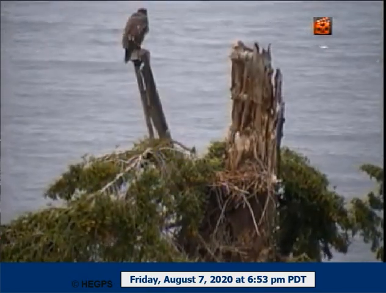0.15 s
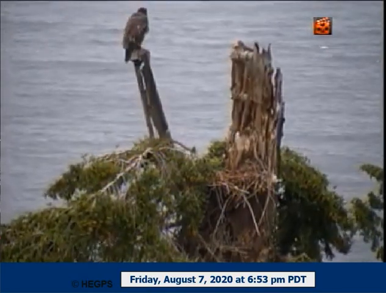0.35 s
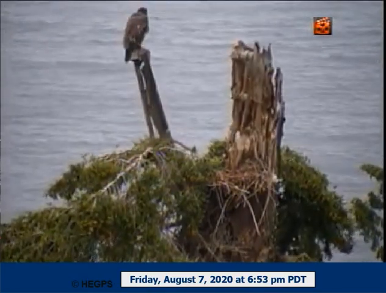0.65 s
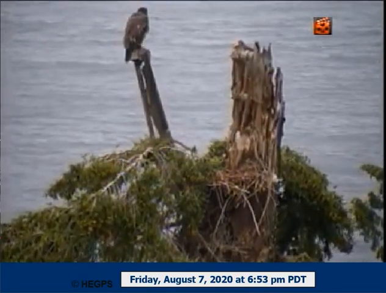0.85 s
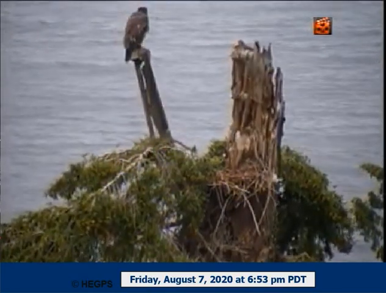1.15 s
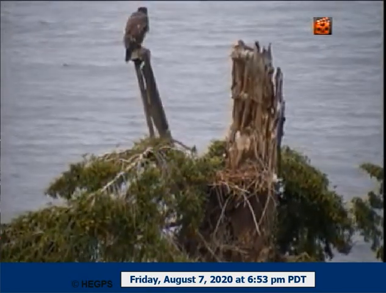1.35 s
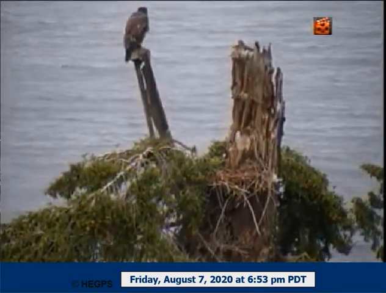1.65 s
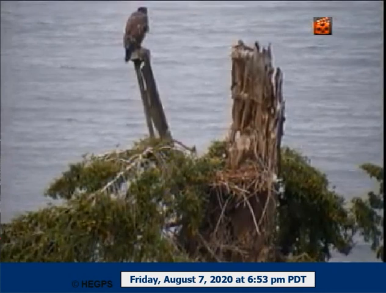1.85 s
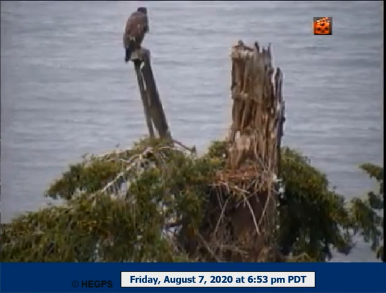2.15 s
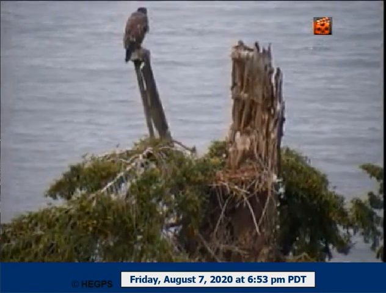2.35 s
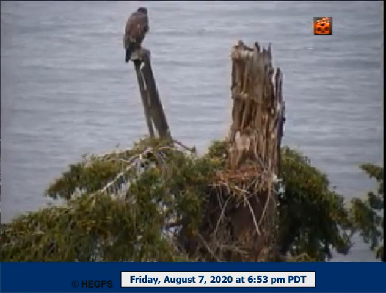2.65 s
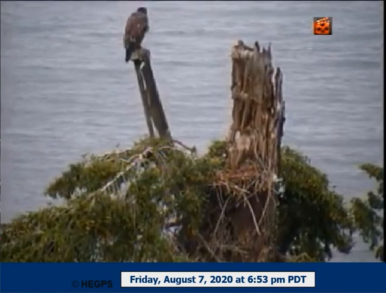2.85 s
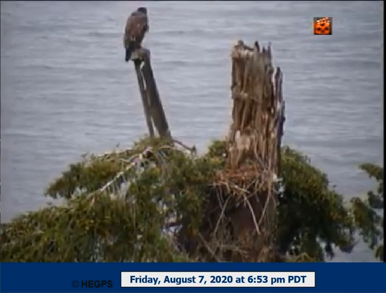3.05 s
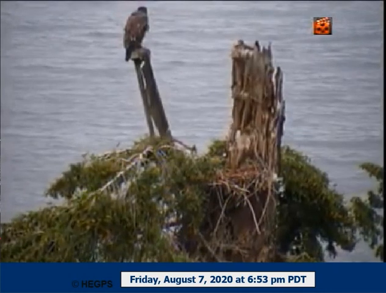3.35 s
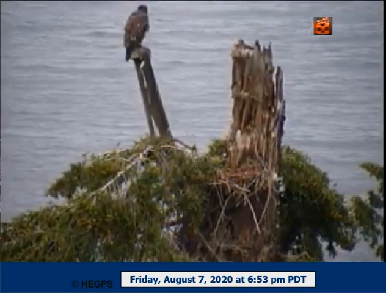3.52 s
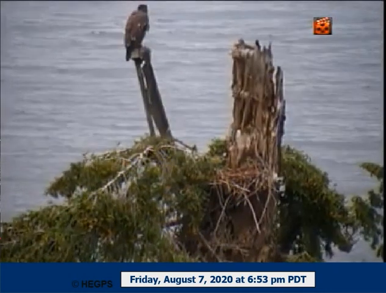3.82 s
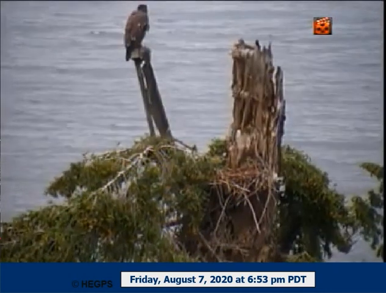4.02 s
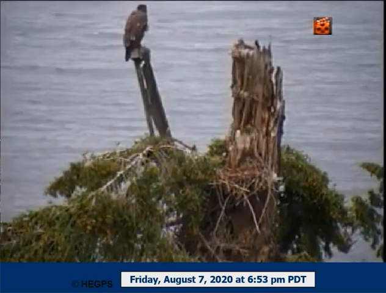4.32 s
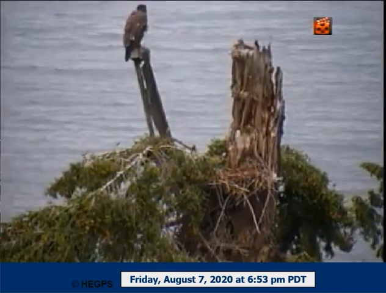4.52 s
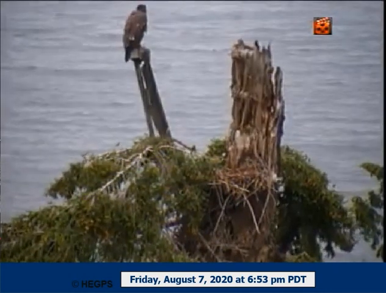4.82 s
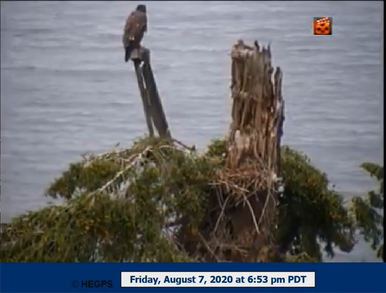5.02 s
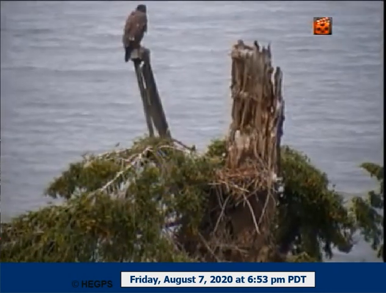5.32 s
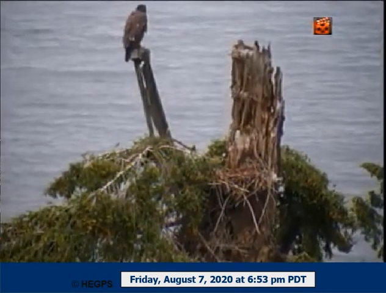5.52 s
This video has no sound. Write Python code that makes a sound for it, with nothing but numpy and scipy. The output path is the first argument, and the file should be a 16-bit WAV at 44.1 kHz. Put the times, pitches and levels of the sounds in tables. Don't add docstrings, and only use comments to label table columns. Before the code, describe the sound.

A close young eagle calls twice from a treetop perch: each call a thin pip, a quick stutter, a brief held whistle and a breaking downward slide, raspy at the edges. Between them come only gently wavering water hiss, subsiding low wind boom on the microphone and a few barely audible high chips. Branches and a distant shore return a dull, weak wash after each call.

```python
import sys
import numpy as np
from scipy import signal
from scipy.fft import rfft, irfft
from scipy.io import wavfile

SR = 44100
rng = np.random.default_rng(int(sys.argv[2]) if len(sys.argv) > 2 else 0)


def attenuation_scalar(level_db):
    decades = np.asarray(level_db, float) / 20
    return 10 ** decades


def transcribe(u):
    v = np.clip(np.atleast_2d(u).T, -1, 1)
    q = np.round(v * 32767).astype(np.int16)
    wavfile.write(sys.argv[1], SR, q)


N = 250488


def rms_one(x):
    return x / np.sqrt(np.mean(x ** 2) + 1e-20)


def in_time(rows):
    s, *columns = np.transpose(rows)
    return [np.interp(np.arange(N) / SR, s, column) for column in columns]


def band(x, low_hz, high_hz, order=2):
    return signal.sosfilt(signal.butter(order, [low_hz, high_hz], "band", fs=SR, output="sos"), x)


def drift(rate_hz, size=N):
    pole = np.exp(-2 * np.pi * rate_hz / SR)
    settled = signal.lfilter([1], [1, -2 * pole, pole * pole], rng.standard_normal(size + SR))[SR:]
    return rms_one(settled)


def coloured_noise(spectrum):
    hz, db = np.array(spectrum).T
    colour = attenuation_scalar(np.interp(np.log(np.fft.rfftfreq(N, 1 / SR) + 1), np.log(hz), db))
    return rms_one(irfft(rfft(rng.standard_normal(N)) * colour, N))


def add(track, start_s, sound):
    at = round(start_s * SR)
    track[at:at + len(sound)] += sound


# (time [s], level [dB])
GUSTS = [(0.0, -21), (0.16, -14.5), (0.17, -22), (1.53, -17), (1.75, -25.5), (2.01, -22), (2.09, -32.5),
         (2.37, -22.5), (2.4, -29), (3.16, -25), (3.18, -29), (4.49, -31.5), (4.65, -24.5), (4.9, -34.5),
         (5.46, -29.5), (5.68, -32)]
# (lower edge [Hz], upper edge [Hz])
HOUSING_BANDS = [
    (70, 115.5),
    (110, 173.2),
    (170, 224.4),
]
# (level at a -25 dB gust [dB], share of the gust's swing [dB per dB])
HOUSING_SHARES = [
    (-30.5, 1.09),
    (-28, 1.12),
    (-31, 0.71),
]


def wind(lump_db=1.47, lumps_per_s=2.4):
    gust_db = in_time(GUSTS)[0]
    out = np.zeros(N)
    for (level_db, share), (low_hz, high_hz) in zip(HOUSING_SHARES, HOUSING_BANDS):
        turbulence = rng.standard_normal(N + SR)
        mode = rms_one(band(turbulence, low_hz, high_hz, order=3)[SR:])
        mode_db = level_db + share * (gust_db + 25) + lump_db * drift(lumps_per_s)
        out += attenuation_scalar(mode_db) * mode
    return out


# (time [s], level [dB])
WATER_SWELL = [(0.0, -37), (0.93, -34.5), (1.44, -35), (2.36, -38), (3.18, -37.5), (3.69, -37),
               (4.46, -36.5), (4.98, -38), (5.68, -38)]
# (frequency [Hz], level per Hz [dB])
WATER_SPECTRUM = [(150, -36), (236, 1.5), (275, -6.5), (400, -9.5), (531, -16.5), (690, -8), (826, -17.5),
                  (957, -10.5), (1370, -18), (2210, -22), (3600, -32.5), (4300, -38.5), (6500, -44),
                  (12500, -52)]


def water(patchy_db=0.67):
    hiss = coloured_noise(WATER_SPECTRUM)
    hiss /= np.std(band(hiss, 300, 1500, order=4))
    return attenuation_scalar(in_time(WATER_SWELL)[0] + patchy_db * drift(3.1)) * hiss


# (time [s], peak level [dB])
SNAP = (1.3189, -34)


def twig():
    snap_s, peak_db = SNAP
    t = np.arange(200) / SR
    out = np.zeros(N)
    add(out, snap_s, attenuation_scalar(peak_db - 60 * t / .002) * rng.standard_normal(len(t)))
    return band(out, 4500, 12500)


# (time [s], peak level [dB], top pitch [Hz], length [s])
BIRD_CHIPS = [
    (3.586, -58, 7950, .037),
    (3.638, -57, 7350, .033),
    (3.740, -61, 8000, .036),
    (3.831, -66, 7800, .038),
]


def small_bird(rise_hz=950, drop_hz=1800):
    out = np.zeros(N)
    for start_s, peak_db, top_hz, length_s in BIRD_CHIPS:
        u = np.linspace(0, 1, round(length_s * SR))
        rise = rise_hz * np.clip(1 - u / 0.41, 0, 1) ** 2
        drop = drop_hz * np.clip((u - .45) / 0.45, 0, 1) ** 2
        cycles = np.cumsum(top_hz - rise - drop) / SR
        envelope = np.sin(np.pi * u) ** .5 * attenuation_scalar(peak_db + 4 * drift(200, size=len(u)))
        add(out, start_s, np.sqrt(2) * envelope * np.sin(2 * np.pi * cycles))
    return out


def leaves(x, blur_db=-5, t60_s=0.071):
    t = np.arange(SR // 10) / SR
    blur = rng.standard_normal(len(t)) * attenuation_scalar(-60 * t / t60_s)
    return x + attenuation_scalar(blur_db) * signal.fftconvolve(x, blur / np.linalg.norm(blur))[:N]


def echoes(x, near_db=-24, near_t60_s=.06, shore_db=-34, shore_t60_s=.28,
           far_db=-34, far_t60_s=1.8, delay_s=0.18, flutter_db=2.5):
    t = np.arange(SR) / SR
    late = np.maximum(t - delay_s, 0)
    near = rng.standard_normal(SR) * attenuation_scalar(-60 * t / near_t60_s)
    shore = band(rng.standard_normal(SR), 3100, 8000, order=1)
    shore = shore * attenuation_scalar(-60 * late / shore_t60_s) * np.clip(late / 0.044, 0, 1)
    far = band(rng.standard_normal(SR), 3730, 4150, order=2)
    far = far * attenuation_scalar(-60 * late / far_t60_s) * np.clip(t / delay_s, .15, 1) ** 2
    paths = [(near_db, near), (shore_db, shore), (far_db, far)]
    response = sum(attenuation_scalar(db) * path / np.linalg.norm(path) for db, path in paths)
    return signal.fftconvolve(x, response)[:N] * attenuation_scalar(flutter_db * drift(58))


CALL_ONSETS = [
    1.669,
    4.704,
]
# (time after onset [s], pitch [Hz], effort [dB], odd harmonics [dB], gape [dB per octave])
OPENING_PIP = [
    (0, 1810, -47, -30, -4),
    (.0045, 1815, -31, -35, 12),
    (.008, 1850, -37, -7, 12),
    (.0115, 1885, -43, -2, 5),
]
# (time [s], pitch [Hz], effort [dB], odd harmonics [dB], gape [dB per octave])
STUTTER_NOTES = [
    [(1.680, 2040, -36, 9, 9), (1.685, 2120, -40, -1, 2), (1.690, 2230, -38, -9, -2),
     (1.694, 2150, -50, -6, 3)],
    [(4.7142, 1580, -34, -7, 13), (4.717, 1640, -26.5, 4.5, 6.5), (4.7225, 1640, -28, 4, 6),
     (4.7247, 1730, -31, 0, 7)],
]
HOLD_NOTES = [
    [(1.689, 1880, -44, 4, 4), (1.694, 1890, -33, -20, 18.5), (1.705, 1919, -31, -36, 14),
     (1.723, 1910, -32, -33, 9.2), (1.734, 1830, -26, -14, 3), (1.744, 1840, -44, -6, 8)],
    [(4.7285, 1870, -28, 4, -4), (4.733, 1860, -22.5, -12, 3), (4.745, 1866, -25, -4, -5),
     (4.754, 1856, -24, -12, -3), (4.760, 1840, -21, -28, -3), (4.768, 1819, -30, -27, -1),
     (4.771, 1815, -42, -14, 1.1)],
]
FALL_NOTES = [
    [(1.748, 1852, -34, 9, -13), (1.753, 1763, -27, -2.5, -2), (1.770, 1748, -26.5, -4, -1.1),
     (1.800, 1697, -26.5, -2.5, -1), (1.808, 1534, -28, -5, -1), (1.818, 1365, -35.5, -0.5, 3),
     (1.833, 1156, -41, -4, 7.5), (1.854, 1110, -39.5, 3, -5.5), (1.870, 970, -50, -6, -5)],
    [(4.775, 1826, -30, 9, -13), (4.795, 1784, -35, 8.5, -8), (4.808, 1734, -25, -4, -10),
     (4.818, 1690, -28, -6, -5), (4.838, 1414, -30.5, -4, 0.1), (4.849, 1213, -34.5, -9, -3),
     (4.859, 1150, -39, -2, -0.5), (4.885, 1080, -44, -1, -6), (4.920, 950, -62, -6, -16)],
]
# (share of the flip to come, pitch [Hz], effort [dB], odd harmonics [dB], gape [dB per octave])
REGISTER_FLIP = [
    (1, 1950, -46, 3, 0.1),
    (.55, 2090, -35, 9, -6),
]
HOLD_FLIPS = [0, .0045]
FALL_FLIPS = [.009, .006]


def notes():
    pips = [[(onset_s + s, *rest) for s, *rest in OPENING_PIP] for onset_s in CALL_ONSETS]
    out = [*pips, *STUTTER_NOTES]
    for note, flip_s in zip([*HOLD_NOTES, *FALL_NOTES], [*HOLD_FLIPS, *FALL_FLIPS]):
        lead = [(min(note)[0] - share * flip_s, *rest) for share, *rest in REGISTER_FLIP if flip_s]
        out.append([*lead, *note])
    return out


# (frequency [Hz], level [dB])
THROAT_GAIN = [(2250, -5.5), (2850, -5.5), (4300, 1.5), (5400, -2), (6500, -14), (8500, -12.5), (9000, -23)]
# (frequency [Hz], depth [dB], width [Hz])
THROAT_DIPS = [
    (2560, 10, 110),
    (5030, 13, 130),
]


def throat_db(hz):
    pipe_hz, pipe_db = np.array(THROAT_GAIN).T
    gain_db = np.interp(np.log(hz), np.log(pipe_hz), pipe_db)
    for at_hz, depth_db, width_hz in THROAT_DIPS:
        gain_db = gain_db - depth_db * np.exp(-((hz - at_hz) / width_hz) ** 2)
    return gain_db


# (time [s], depth [dB])
SECOND_DIPS = [
    (1.698, 18),
    (1.718, 17),
    (4.785, 8),
]
# (frequency [Hz], level [dB])
WINDPIPE_GAIN = [(5500, -14), (6800, -22), (8300, -9), (9200, -26), (9800, -16), (10400, -30), (11100, -13),
                 (11800, -50)]


def harmonic_levels(t, pitch, effort_db, odd_db, gape_db, fundamental_db=-14, low_lift_db=26,
                    dip_s=0.0021, upper_db=-1):
    level_db = {}
    for k in range(2, 6):
        tilt_db = odd_db * (k % 2) + gape_db * min(np.log2(k / 2), 1)
        level_db[k] = effort_db + throat_db(k * pitch) + tilt_db
    for at_s, depth_db in SECOND_DIPS:
        level_db[2] = level_db[2] - depth_db * np.exp(-((t - at_s) / dip_s) ** 2)
    level_db[1] = effort_db + 0.75 * odd_db + fundamental_db + low_lift_db * np.log2(1800 / pitch)
    level_db[1] -= .12 * np.maximum(pitch - 1800, 0)
    pipe_hz, pipe_db = np.array(WINDPIPE_GAIN).T
    for k in range(6, 10):
        resonance_db = np.interp(np.log(k * pitch), np.log(pipe_hz), pipe_db)
        level_db[k] = np.maximum(level_db[4], level_db[5]) + upper_db + resonance_db
    return level_db


# (frequency [Hz], level per Hz [dB])
HOARSE_AIR = [(2500, -20), (4000, 5), (6000, -3), (8200, -3), (9000, -18), (9700, -23), (10400, -9),
              (11100, -7.5), (11700, -41)]


def breath(t, level_db, air, breath_db=-39, hoarser_db_per_s=2.63, rasp=2.5, rasp_s=.006):
    effort = np.sqrt(sum(attenuation_scalar(level_db[k]) ** 2 for k in range(2, 6)))
    rush = 1 + rasp * np.exp((t[0] - t) / rasp_s)
    flow = air[round(t[0] * SR):][:len(t)]
    return attenuation_scalar(breath_db + hoarser_db_per_s * t[0]) * np.sqrt(effort) * rush * flow


def eagle(jitter=0.0045, shimmer_db=.7, shimmer_hz=80, cutoff_hz=12700):
    out = np.zeros(N)
    air = coloured_noise(HOARSE_AIR)
    for note in notes():
        s, *columns = np.array(sorted(note)).T
        t = np.arange(s[0], s[-1], 1 / SR)
        pitch, effort_db, odd_db, gape_db = [np.interp(t, s, column) for column in columns]
        level_db = harmonic_levels(t, pitch, effort_db, odd_db, gape_db)
        cycles = np.cumsum(pitch * (1 + jitter * drift(250, size=len(t)))) / SR
        sound = breath(t, level_db, air)
        for k, db in level_db.items():
            gain = attenuation_scalar(db + shimmer_db * drift(shimmer_hz, size=len(t))) * (k * pitch < cutoff_hz)
            sound = sound + np.sqrt(2) * gain * np.sin(2 * np.pi * k * cycles + k * k)
        edges = np.clip(np.minimum(t - s[0], s[-1] - t) / .0006, 0, 1)
        add(out, s[0], sound * edges)
    return out


def scene():
    call = eagle()
    mono = wind() + water() + twig() + leaves(small_bird()) + echoes(call) + call
    return np.array([mono, mono])


# (start [s], end [s], lower edge [Hz])
TOP_LOSS = [
    (1.70, 1.90, 11500),
    (4.72, 4.93, 11400),
]


def starve(x):
    t = np.arange(N) / SR
    for start_s, end_s, above_hz in TOP_LOSS:
        gate = np.clip(np.minimum(t - start_s, end_s - t) / .02, 0, 1)
        high_pass = signal.butter(10, above_hz, "high", fs=SR, output="sos")
        x = x - gate * signal.sosfiltfilt(high_pass, x)
    return x


def top_cut(x):
    return signal.sosfilt(signal.butter(12, 12660, fs=SR, output="sos"), x)


def record(dry, overload=.5):
    bass = signal.lfilter(*signal.butter(1, 90, fs=SR), dry[0])
    bass = signal.sosfiltfilt(signal.butter(3, 280, fs=SR, output="sos"), bass)
    side = attenuation_scalar(-21.5) * bass + attenuation_scalar(-82.5) * rng.standard_normal(N)
    stereo = dry + side * [[-1], [1]]
    rounded = overload * np.tanh(stereo / overload)
    return top_cut(starve(rounded))


dry = scene()
out = record(dry)
transcribe(out)
```